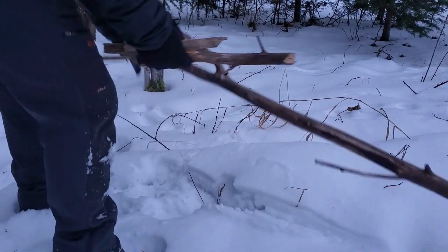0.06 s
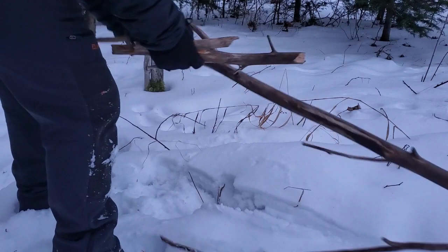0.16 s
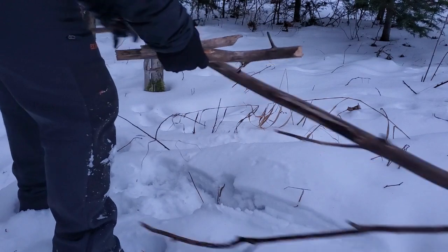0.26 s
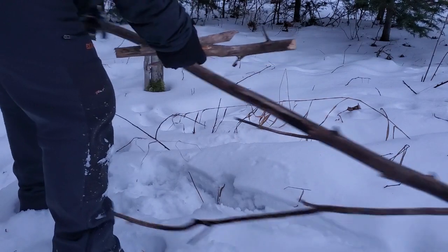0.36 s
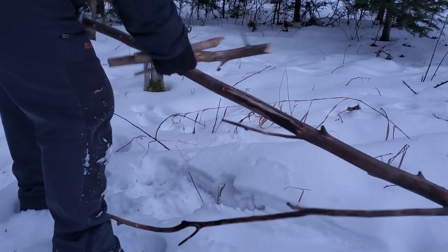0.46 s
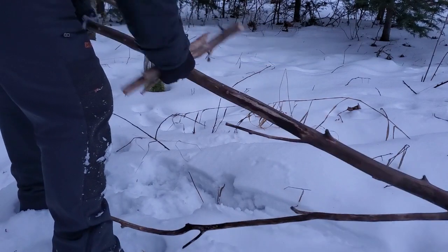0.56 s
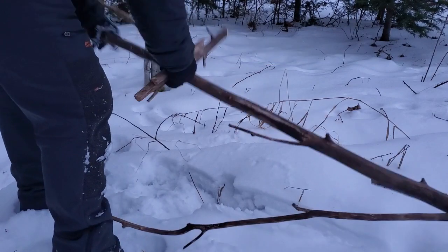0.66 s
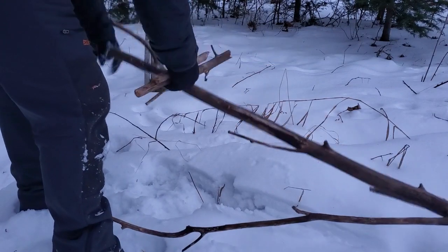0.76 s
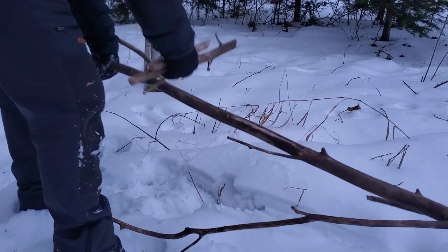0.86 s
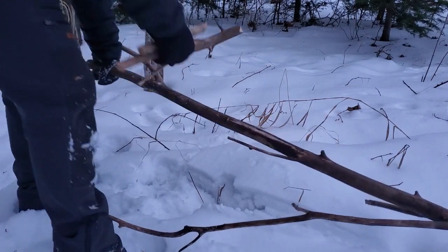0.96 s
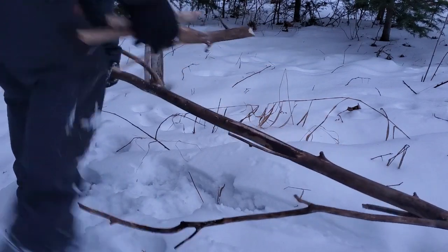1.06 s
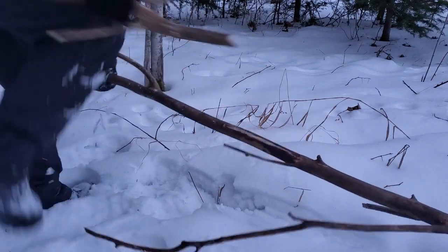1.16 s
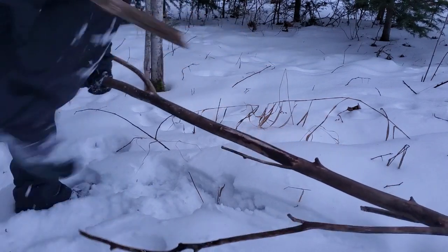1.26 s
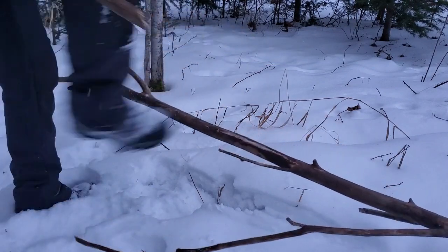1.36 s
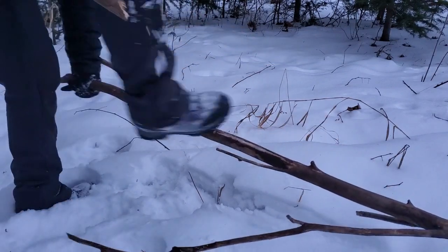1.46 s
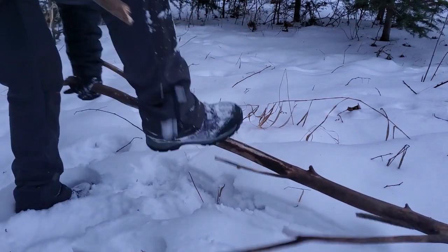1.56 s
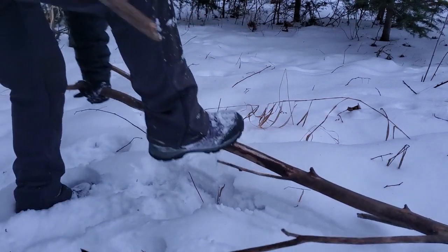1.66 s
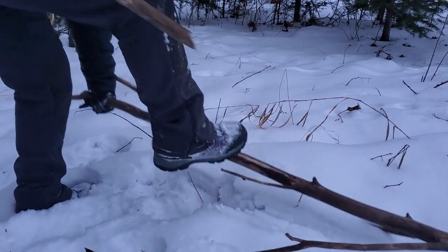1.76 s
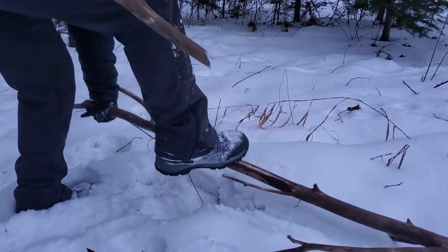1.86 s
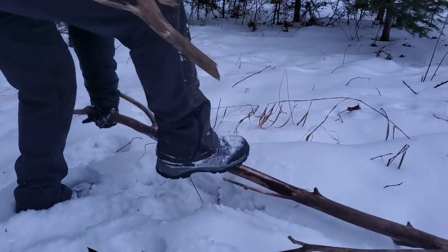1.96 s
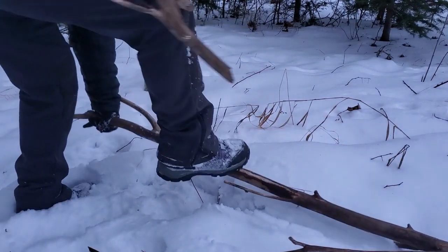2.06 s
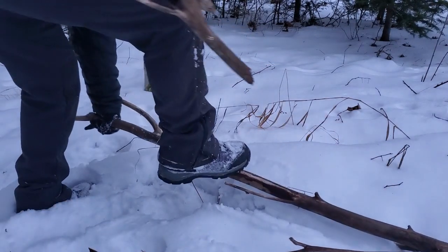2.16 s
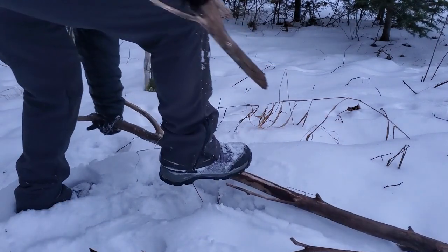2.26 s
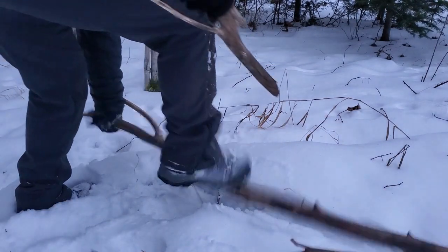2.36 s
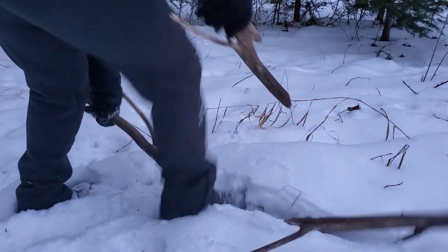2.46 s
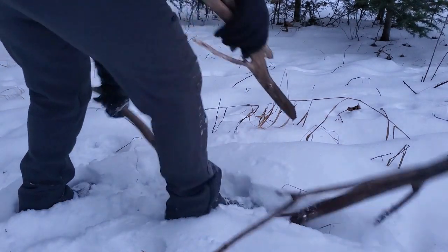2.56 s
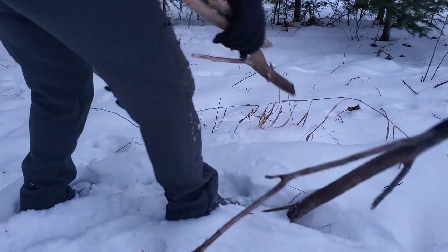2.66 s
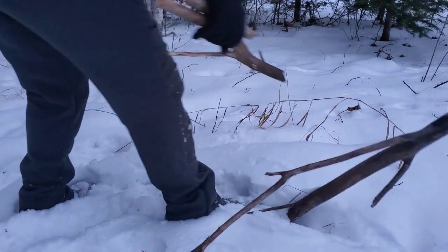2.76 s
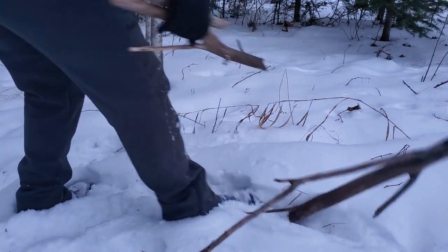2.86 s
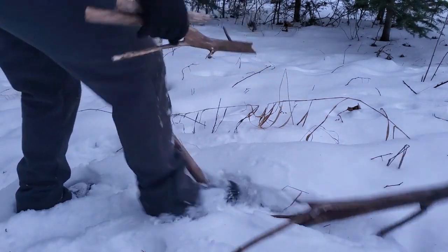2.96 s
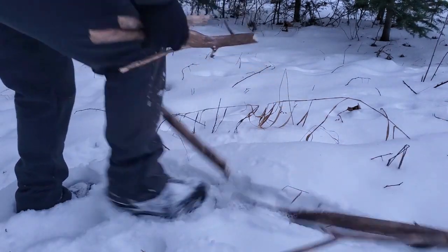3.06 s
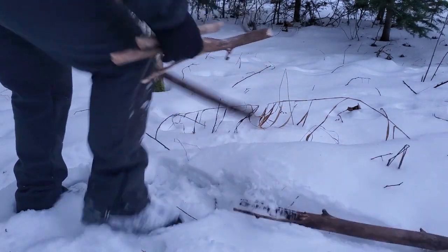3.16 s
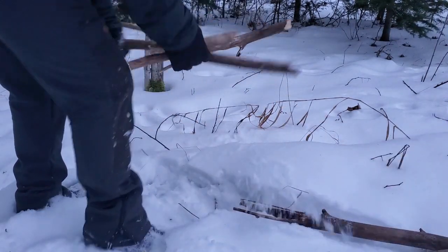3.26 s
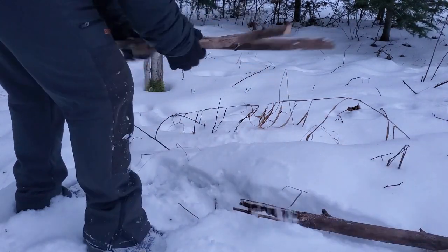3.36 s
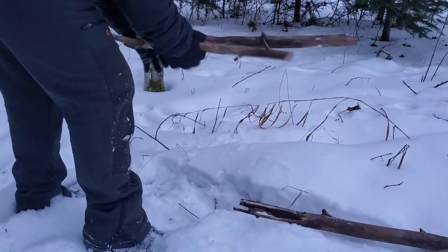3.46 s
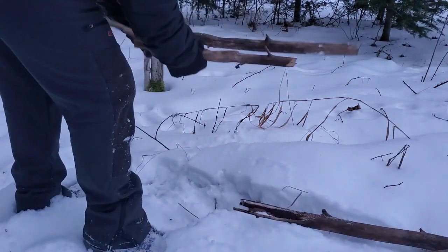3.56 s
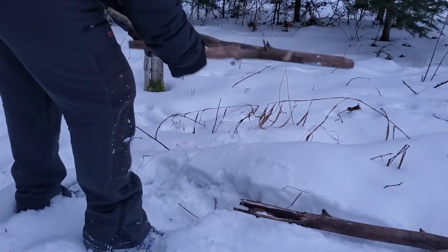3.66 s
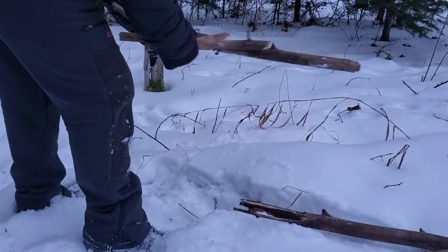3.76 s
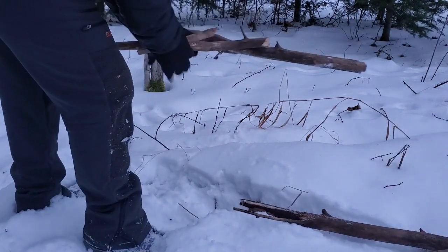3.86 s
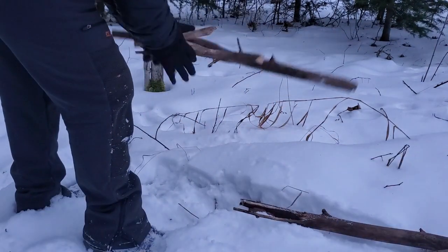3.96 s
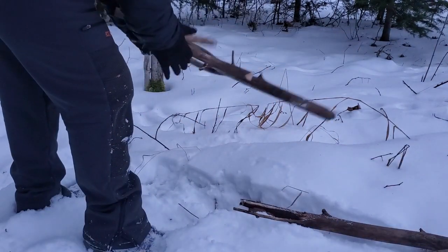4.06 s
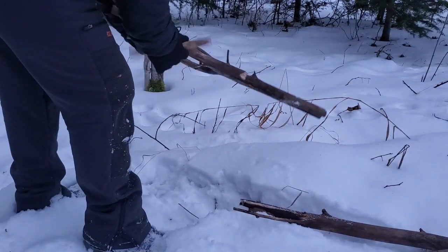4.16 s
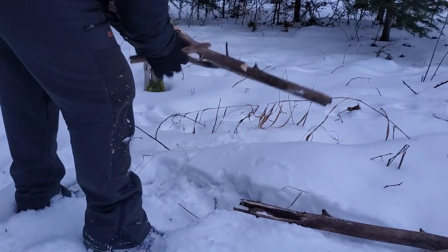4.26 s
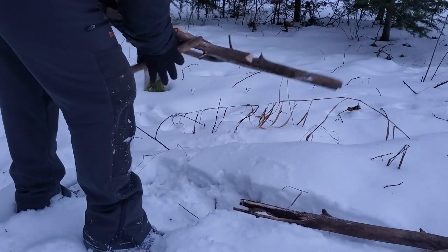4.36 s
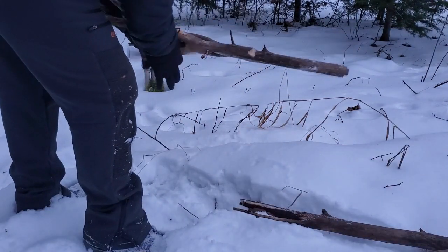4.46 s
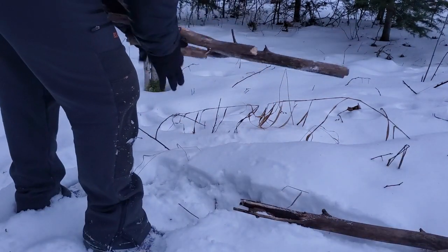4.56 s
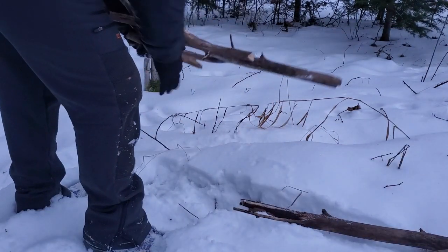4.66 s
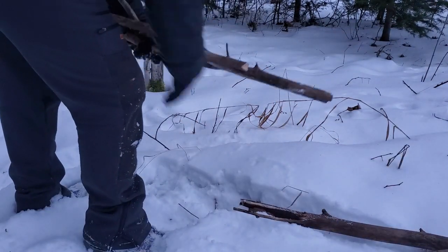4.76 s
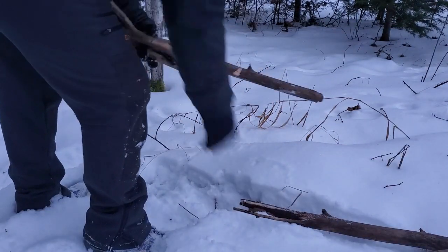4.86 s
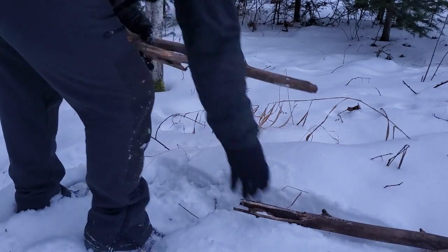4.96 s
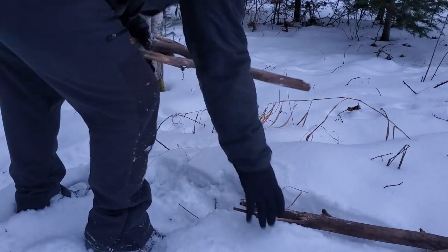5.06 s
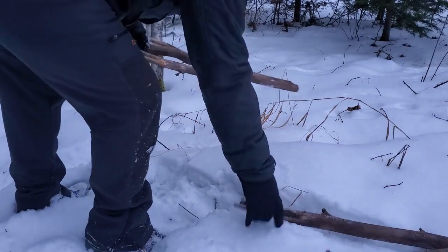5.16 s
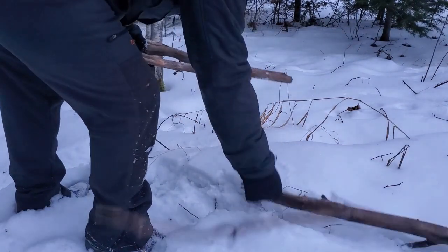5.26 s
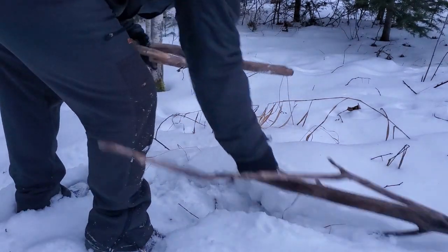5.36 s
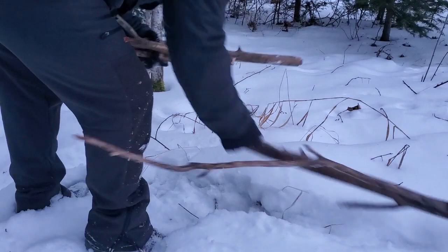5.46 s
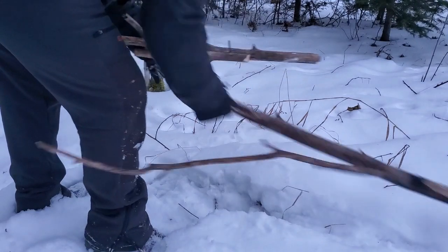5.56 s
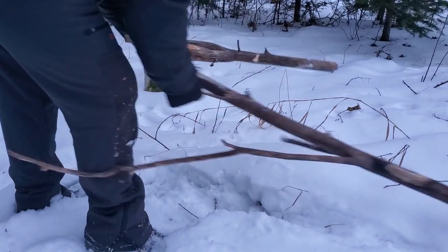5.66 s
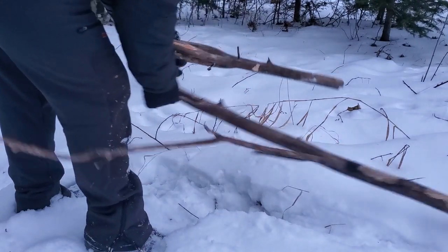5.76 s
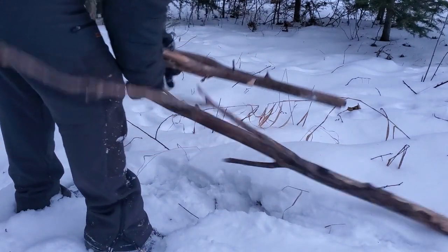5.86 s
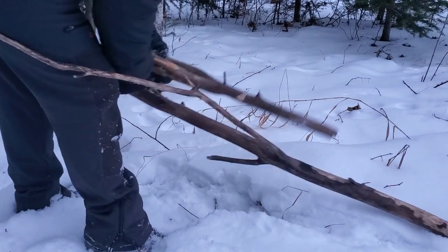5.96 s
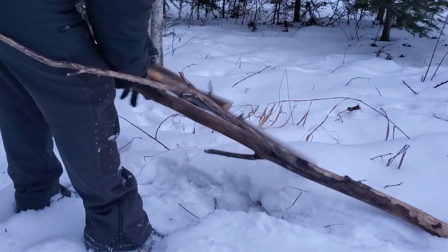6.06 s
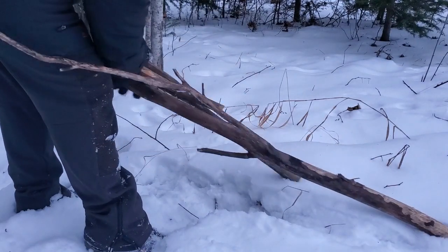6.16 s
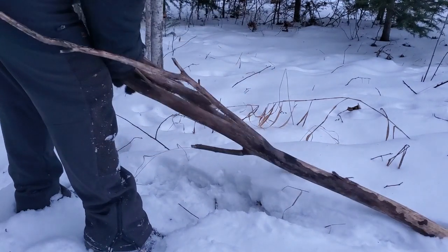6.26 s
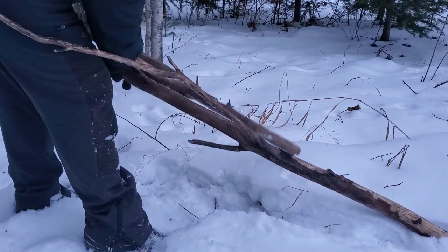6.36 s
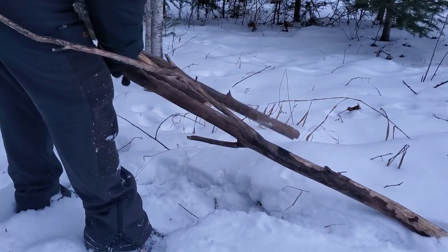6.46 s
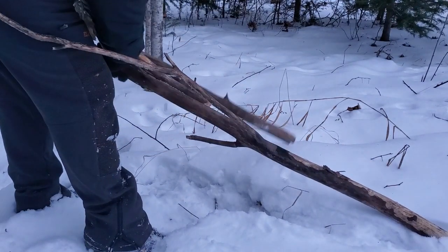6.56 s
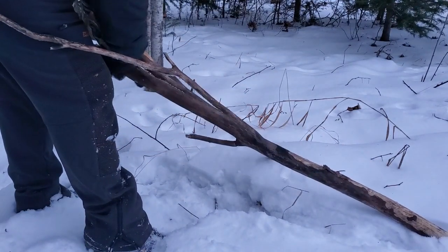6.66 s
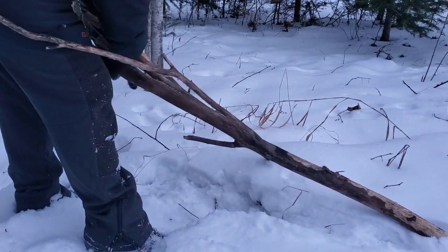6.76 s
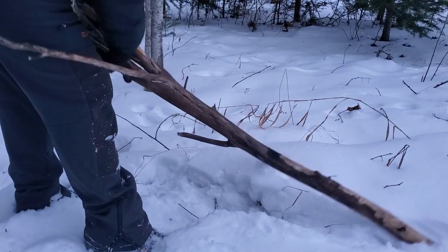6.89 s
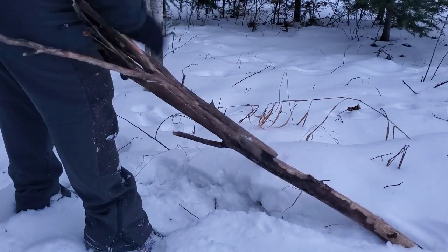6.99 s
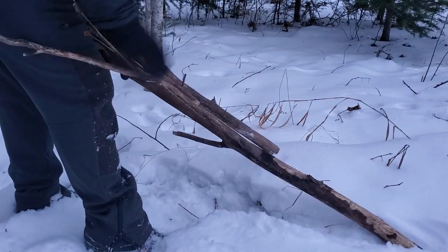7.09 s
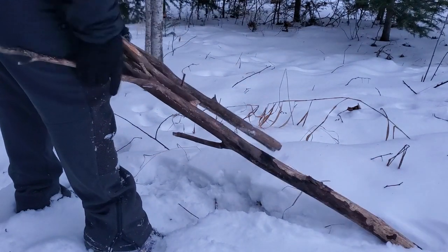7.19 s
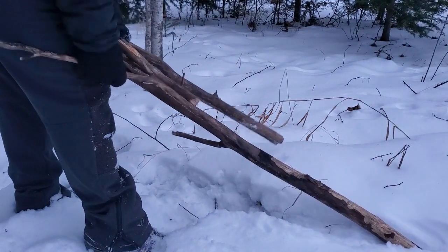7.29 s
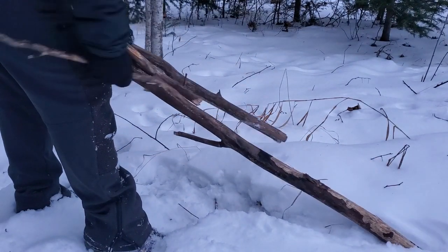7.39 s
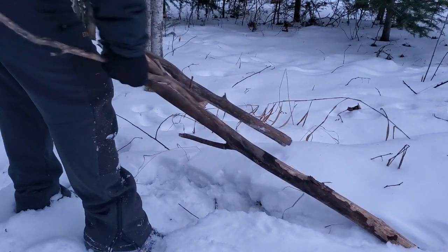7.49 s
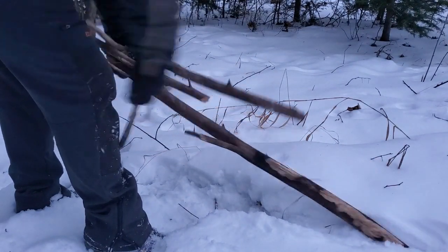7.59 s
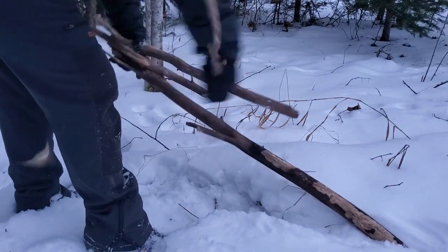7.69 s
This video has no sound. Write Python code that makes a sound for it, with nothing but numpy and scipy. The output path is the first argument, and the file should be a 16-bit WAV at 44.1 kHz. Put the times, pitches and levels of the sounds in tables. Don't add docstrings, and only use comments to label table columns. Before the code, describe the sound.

Close outdoor sound in a snowy wood. Boots crunch through crust while bark scrapes, then a dead branch creaks in tiny ticks and breaks in a loud, splintering double snap. More snow crunches, then near quiet with faint stick taps, gloved rustles and soft wind thumps. Sticks are gathered with light clacks and scraping before a final sharp dry crack at the end.

```python
import sys
import numpy as np
from scipy import signal
from scipy.fft import rfft, irfft
from scipy.io import wavfile
from scipy.ndimage import uniform_filter1d, map_coordinates

SR = 44100
rng = np.random.default_rng(int(sys.argv[2]) if len(sys.argv) > 2 else 0)


def level_to_linear(level):
    exponent = np.asarray(level, float) / 20
    return 10 ** exponent


def master(y):
    cut = np.clip(np.atleast_2d(y).T, -1, 1)
    pcm = np.round(cut * 32767)
    wavfile.write(sys.argv[1], SR, pcm.astype(np.int16))


N = 340893

# t/s, peak level/dB, ring f/Hz, bright share/dB, length/ms
SNAPS = [(2.2836, -23.5, 5000, -20, 0.66), (2.2882, -15.5, 4770, -15, 0.48), (2.2993, -18, 2300, 0.5, 1.13),
         (2.3663, -5.5, 3970, -1, 1.03), (2.37, -11.5, 3280, -13, 1.5), (2.3753, 1.5, 1970, -3.5, 1),
         (2.3771, -1, 2500, -13, 2.5), (2.3888, -19, 2240, -15, 1.1), (2.4582, -8, 2350, -5.5, 1.5),
         (2.46, -10, 2160, -12.5, 2.55), (3.578, -51.5, 4910, -4, 1.6), (5.133, -50, 3316, -12.5, 1.6),
         (5.1525, -43.5, 3220, -15, 3.2), (7.4128, -33, 5010, -3.5, 2.1), (7.4178, -37, 5000, 4, 0.91),
         (7.4985, -44, 5500, -3, 0.77), (7.5153, -1, 3896, -3, 1.2), (7.5172, -6, 7100, -12, 1.5),
         (7.5545, -18.5, 1900, -35, 1.6)]
# f/Hz, level/dB
TEAR_SPECTRUM = [(2600, -30), (4500, 1), (5500, -3.5), (6400, -4), (8050, 3), (9000, -4.5), (10400, -26.5),
                 (12500, -7.5), (15300, -13), (16800, -40)]


def snaps():
    def shape(t, length_ms):
        crack = np.exp(-(1000 * t / length_ms) ** 2.1) * (1 - np.exp(-t / 0.00045))
        tail = level_to_linear(-25.5 - 60 * t / .03)
        return crack + tail
    return level_to_linear(-0.5) * bursts(SNAPS, shape, width=.2, grit_db=-6, hiss_db=12.5)


# t/s, level/dB, f/Hz, t60/s
BRANCH_MODES = [(7.5165, -21.5, 700.5, 0.073), (7.5165, -27.5, 1000, 0.059), (7.516, -8.5, 2230, 0.018),
                (7.5161, -3.5, 2990, 0.015), (2.3765, -31, 810, 0.08), (2.3765, -24, 2020, 0.03),
                (2.4595, -8.5, 2270, .015), (2.4595, -24.5, 202.5, 0.061), (3.106, -37, 121, 0.12),
                (1.55, -38, 234, 0.068), (3.859, -45.5, 335, 0.066), (3.859, -50, 516, 0.094),
                (2.3765, -29.5, 380, .06), (7.5545, -17.5, 1064, 0.03), (7.541, -28, 3200, .012),
                (7.549, -27, 2000, .012), (4.365, -52, 1000, .025), (4.8375, -52, 1470, .05),
                (4.238, -50, 1480, .05), (4.514, -58, 850, .08), (3.424, -57, 3400, .06),
                (3.803, -62, 3450, .04)]


def branch():
    out, t = np.zeros(N + SR), np.arange(SR // 4) / SR
    for s, db, hz, t60 in BRANCH_MODES:
        swell = 1 - np.exp(-t * hz / 0.47)
        out[round(s * SR):][:len(t)] += level_to_linear(db - 60 * t / t60) * swell * np.sin(2 * np.pi * hz * t)
    return out[:N]


# t/s, peak level/dB, ring f/Hz, bright share/dB, t60/s
CREAKS = [(1.7654, -32, 2180, -12, 0.02), (1.8243, -33, 2210, -12, 0.02), (1.8564, -47, 1340, -12, 0.02),
          (1.941, -40, 3440, -13, 0.02), (1.9484, -41, 3350, -12, 0.02), (1.956, -36, 3360, -13, 0.02),
          (1.9859, -33, 1240, -17, 0.02), (1.9984, -33, 1200, -14, 0.02), (2.0154, -33, 3240, -17, 0.02),
          (2.0234, -34, 1140, -19, 0.02), (2.0388, -35, 1150, -12, 0.02), (2.0484, -34, 1870, -13, 0.02),
          (2.0624, -36, 1000, -17, 0.02), (2.0812, -35, 1290, -16, 0.02), (2.0934, -35, 1630, -16, 0.02),
          (2.1004, -38, 1360, -15, 0.02), (2.1274, -37, 1620, -22, 0.02), (2.1445, -35, 1200, -16, 0.02),
          (2.1615, -33, 1660, -10, 0.02), (2.3974, -22, 1910, -12, 0.02), (2.4094, -22, 2520, -15, 0.02),
          (2.4764, -24, 1890, -13, 0.02), (2.5764, -34, 1780, -17, 0.02), (3.0774, -27, 1520, -11, 0.02),
          (3.1394, -37, 2600, -10, 0.02), (6.8274, -41, 3980, -15, 0.02), (7.5324, -18, 993, -20, 0.02),
          (7.5704, -29, 2890, -18, 0.02), (7.5914, -29, 2330, -22, 0.02)]


def creaks():
    def shape(t, t60):
        return level_to_linear(-60 * t / t60) * (1 - np.exp(-t / 0.0004))
    return level_to_linear(-2.5) * bursts(CREAKS, shape, width=0.2, grit_db=1.5, hiss_db=10.5)


# t/s, peak level/dB, low mode f/Hz, high mode f/Hz, bright share/dB
KNOCKS = [(.533, -46.5, 2140, 3180, -12), (.667, -50, 1400, 2290, -14), (2.243, -40, 1220, 3010, -8.5),
          (3.4227, -49, 1526, 3390, -14), (3.802, -54.5, 1630, 3450, -8), (3.8589, -37.5, 950, 2195, -31),
          (4.2371, -44.5, 1480, 2250, -30), (4.3643, -46, 1760, 3100, -24), (4.5127, -51, 847, 3250, -21),
          (4.636, -56.5, 873, 3450, -26), (4.8368, -50.5, 1470, 2490, -24),
          (5.668, -39.5, 1093, 2830, -20.5), (5.6996, -31.5, 1800, 2880, -18), (5.707, -39, 875, 1800, -18),
          (5.814, -53, 1060, 2900, -5), (6.0779, -48, 950, 3003, -4.5), (6.347, -59.5, 1010, 3140, -14),
          (6.455, -44, 949, 2180, -26.5), (6.615, -62, 2200, 3500, -11), (6.866, -48.5, 1034, 2050, 1),
          (7.183, -53, 1320, 1730, -21.5)]
# f/Hz, level/dB
STICK_SPECTRUM = [(150, -39), (300, -2), (1000, -1), (2200, -6.5), (2900, -12), (4500, -24), (6500, -48.5),
                  (12000, -120)]


def knocks():
    out, t = np.zeros(N + SR), np.arange(6144) / SR
    fine, stick = response(TEAR_SPECTRUM), response(STICK_SPECTRUM)
    for s, db, low_hz, high_hz, bright_db in KNOCKS:
        rattle_t60 = .058 * np.exp(-.018 * (bright_db + 14.5))
        noise = rng.standard_normal(len(t))
        decay = level_to_linear(-60 * t / 0.0058) + level_to_linear(-11.0 - 60 * t / rattle_t60) + level_to_linear(-23 - 60 * t / 0.24)
        blow = decay * noise
        two_modes = mode(t, low_hz, 0.15 * low_hz) + level_to_linear(-0.5) * mode(t, high_hz, 0.12 * high_hz)
        ringing = through(through(blow, two_modes), stick)
        body = to_peak(ringing) + level_to_linear(-2.5) * to_peak(through(blow, stick))
        tick = through(level_to_linear(-60 * t / 0.013) * noise, fine)
        knock = to_peak(body) + level_to_linear(bright_db + 7.0) * to_peak(tick)
        out[round(s * SR):][:len(t)] += level_to_linear(db + 1.0) * knock
    return out[:N]


# t/s, peak level/dB, ring f/Hz, bright share/dB, t60/s
LUMPS = [(0.019, -23.5, 2000, -9.5, 0.064), (0.346, -39, 1450, -23, 0.04),
         (1.555, -34.5, 926, -11.5, 0.099), (1.622, -34, 2730, -9, 0.066), (1.696, -38, 2160, -10, 0.038),
         (1.753, -28, 2140, -10, 0.02), (1.818, -32.5, 2240, -3, 0.071), (1.971, -34.5, 1130, -6, 0.036),
         (2.189, -24.5, 1520, -10, 0.017), (2.212, -35, 1270, -20, 0.023), (2.948, -30, 2240, -13, 0.02),
         (2.956, -32, 1130, -14, 0.23), (3.104, -31, 1010, -12.5, 0.063), (3.268, -21, 2400, -33, 0.067),
         (4.974, -36.5, 910, -14.5, 0.046), (5.142, -45.5, 3110, -17.5, 0.039),
         (5.246, -32.5, 3000, -20, 0.08), (6.099, -38.5, 1910, -8, 0.027),
         (6.811, -40.5, 2050, -14.5, 0.04), (6.901, -39, 1030, -2, 0.04), (6.958, -34, 3270, 3, 0.026),
         (7.362, -43.5, 1390, -5, 0.025)]


def lumps():
    def shape(t, t60):
        return level_to_linear(-60 * t / t60) * (1 - np.exp(-t / 0.0012))
    return level_to_linear(-3.5) * bursts(LUMPS, shape, width=0.17, grit_db=-0.5, hiss_db=13.0)


def bursts(rows, shape, width, grit_db, hiss_db):
    out, t = np.zeros(N + SR), np.arange(2048) / SR
    crisp, fine = response(CRISP_SPECTRUM), response(TEAR_SPECTRUM)
    for s, db, hz, bright_db, length in rows:
        burst = shape(t, length) * rng.standard_normal(len(t))
        ring = through(through(burst, mode(t, hz, width * hz)), mode(t, hz, 1.2 * hz))
        grit = level_to_linear(grit_db) * to_peak(through(burst, crisp))
        hiss = level_to_linear(bright_db + hiss_db) * to_peak(through(burst, fine))
        out[round(s * SR):][:len(t)] += level_to_linear(db) * to_peak(to_peak(ring) + grit + hiss)
    return out[:N]


# f/Hz, level/dB
DULL_SPECTRUM = [(71, -26.5), (120, -0.5), (209, -8.5), (290, -5), (493, -7), (762, -2.5), (2000, -6),
                 (2600, -32.5), (4400, -120)]
# f/Hz, level/dB
CRISP_SPECTRUM = [(710, -31), (1200, -6), (1940, -4), (2110, 0), (3360, -1), (3680, -4.5), (5010, -3.5),
                  (6200, -13.5), (8060, -41), (13600, -120)]
# f/Hz, level/dB
FINE_SPECTRUM = [(2820, -37), (4800, 0.5), (5230, 0), (6120, -8), (6620, 0), (8050, 3), (9050, -1.5),
                 (10200, -20.5), (13300, -49), (22000, -120)]
# f/Hz, level/dB
ICY_SPECTRUM = [(6000, -39), (10200, -9), (12600, 3.5), (15500, -5.5), (16300, -12.5), (16500, -52.5)]


def crunch():
    level, dull, sharp, icy = pressure()
    clump = slips(70, fall_s=0.0093, depth_db=1.8) + 1.2 * wobble(160)

    def layer(spectrum, rough_db):
        return patchy(coloured(grains(rough_db, clump), spectrum), patchy_db=2.5)

    middle = level * layer(CRISP_SPECTRUM, rough_db=1.5)
    coarse = dull * layer(DULL_SPECTRUM, rough_db=0.0)
    fine = sharp * layer(FINE_SPECTRUM, rough_db=1.0)
    press = (level / level_to_linear(-50)) ** .17
    crystals = level_to_linear(-9.5) * icy * press * layer(ICY_SPECTRUM, rough_db=2.5)
    return level_to_linear(-1.0) * (middle + coarse + fine + crystals + level * rubbing(clump))


# t/s of most pressure, level/dB, rise/ms, fall/ms, dull share/dB
TREADS = [(0.08, -35.5, 100, 66, -2.5), (.412, -42, 137, 64, -6), (.886, -51.5, 76, 39, -13),
          (1.062, -47, 92, 59, -2), (1.174, -56, 47, 98, -0.5), (1.54, -58, 9, 200, 8),
          (1.625, -48.5, 76, 93, -2.5), (1.772, -43, 44, 108, -3), (3.074, -40.5, 200, 69, -0.5),
          (3.04, -44, 60, 80, -3), (3.125, -49, 11, 98, -8), (3.145, -51, 30, 60, -5),
          (3.215, -42.5, 50, 90, -3), (3.245, -45, 50, 70, -3), (1.701, -48, 25, 35, -8),
          (3.28, -37, 80, 35, -2), (3.424, -58.5, 3, 85, -22.5)]
# t/s, level/dB, rise/ms, fall/ms, dull share/dB
STRAINS = [(2.02, -49, 170, 15, -3), (2.052, -49, 40, 28, -3), (2.084, -49, 4, 60, -9),
           (2.187, -49, 153, 160, -1), (2.318, -49.5, 41, 60, 0.5), (2.39, -34.5, 14, 90, -2.5),
           (2.46, -31, 80, 63, -3.5), (2.5, -43, 33, 300, -1.5), (2.525, -41, 100, 30, -2),
           (7.5, -58, 257, 20, 4), (7.54, -37, 52, 60, -3), (7.58, -48, 40, 134, -7)]
# t/s, level/dB, rise/ms, fall/ms, dull share/dB
GRIPS = [(3.585, -67, 120, 30, -16), (4.986, -49.5, 18, 39, 0), (5.29, -41, 66, 36.5, -10),
         (5.6, -57.5, 90, 81, -4.5), (5.67, -51.5, 47, 36, -5), (5.72, -52, 40, 57, -10),
         (5.89, -57.5, 185, 91, -9.5), (6.099, -58.5, 15, 70, -1.5), (6.235, -64, 25, 400, -6),
         (6.475, -67.5, 49, 174, 3), (6.826, -56, 53, 128, -7), (6.903, -43.5, 7, 125, -8.5),
         (7.19, -68.5, 5, 260, -2.5)]
# t/s, level/dB, rise/ms, fall/ms, dull
# share/dB
BRUSHES = [(3.535, -78, 20, 80, -5), (3.845, -78, 50, 40, -5), (3.91, -76, 40, 100, -5),
           (3.965, -79, 100, 10, -5), (4.08, -72, 15, 60, -5), (4.13, -76, 80, 10, -5),
           (4.24, -78, 60, 40, -5), (4.286, -77, 5, 50, -5), (4.39, -74, 50, 30, -5),
           (6.603, -74, 3, 40, -5), (6.78, -75, 250, 60, -5), (7.15, -79, 60, 40, -5)]
# t/s, rustle level/dB, fine share/dB
BUSY = [(0, -50.5, -2), (.3, -56, -10.5), (.5, -60.5, -5), (.74, -63.5, -7.5), (.83, -75.5, -3),
        (1.53, -80, -1), (1.9, -76, -4), (2.9, -63, -3), (3.4, -72, -1), (3.66, -89.5, 3), (4.08, -84, -3),
        (4.6, -86.5, -3), (4.9, -71, -2), (5.1, -67, -3.5), (6.05, -76, 4), (6.7, -84.5, 9.5),
        (7.18, -87, -3), (7.35, -71, -5)]


def pressure():
    kinds = [(TREADS, -4, -4.5), (STRAINS, -3, -4.5), (GRIPS, -4, -5), (BRUSHES, 2.5, -3)]
    gains = np.vstack([swells(rows) for rows, *_ in kinds])
    shares_db = [(row[-1], fine_db, icy_db) for rows, fine_db, icy_db in kinds for row in rows]
    dull, fine, icy = level_to_linear(np.transpose(shares_db))[:, :, None]
    busy_db, busy_fine_db = curves(BUSY)
    layers = [(1, 0), (dull, -3), (fine, busy_fine_db), (icy, busy_fine_db - 5)]
    return [np.hypot(joined(gains * share), level_to_linear(busy_db + db)) for share, db in layers]


# start t/s, end t/s, f/Hz,
# width f/Hz, share level/dB
RUBS = [(0.092, 0.798, 1376, 89.5, -7.5), (0.202, 0.334, 2480, 130, 2.5), (0.367, 0.461, 2480, 109, 2.5),
        (0.43, 0.725, 2140, 110, -1), (.7, 0.8, 2900, 200, 3), (1.91, 2.265, 1270, 200, -1.5),
        (1.9, 2.145, 3370, 220, -2.5), (3.027, 3.1, 1510, 250, -5), (3.035, 3.096, 3274, 200, -3.5),
        (3.857, 4.049, 1456, 89.5, -3.5), (4.104, 4.5, 1990, 90.5, 0), (4.838, 4.918, 1453, 90, 4),
        (5.242, 5.307, 5430, 302, -6), (5.537, 6.996, 1000, 49.9, -7.5), (5.55, 7.0, 1915, 90.6, -7.5),
        (5.56, 6.99, 2870, 100, -8), (6.884, 6.956, 985, 49.7, -6), (5.549, 7.002, 4860, 120.3, -9.5),
        (7.18, 7.507, 1420, 148.6, -1.5), (7.182, 7.499, 3070, 249, -1), (7.532, 7.733, 2980, 220, 0),
        (7.53, 7.702, 5570, 220, -6.5), (6.66, 6.84, 8500, 700, 0), (6.89, 7.02, 12400, 900, -12),
        (6.8, 6.94, 4000, 200, -3), (.05, .13, 1000, 250, -2), (.18, .45, 3000, 200, -4),
        (.66, .72, 2000, 500, 2), (3.5, 3.62, 8300, 800, -3), (3.52, 3.61, 5400, 400, 0)]


def rubbing(clump):
    out, scrape = np.zeros(N), grains(2.2, clump)
    t = np.arange(1024) / SR
    for start, end, hz, width_hz, db in RUBS:
        part = scrape[round(start * SR):round(end * SR)]
        fade = np.sqrt(np.hanning(len(part)) ** 0.9)
        body = mode(t, hz, width_hz)
        stroke = through(part, body / np.linalg.norm(body))
        out[round(start * SR):][:len(part)] += level_to_linear(db) * fade * stroke
    return out


def grains(rough_db, clump):
    return unit(level_to_linear(rough_db * wobble(900) + clump) * rng.standard_normal(N))


def slips(rate, fall_s, depth_db):
    kicks = (rng.random(N) < rate / SR) * rng.exponential(1, N)
    load = signal.lfilter([1], [1, -np.exp(-1 / (fall_s * SR))], kicks) + 0.39
    return depth_db * unit(np.log(load) - np.log(load).mean())


def patchy(x, patchy_db):
    z = signal.stft(x, nperseg=256)[2]
    field = uniform_filter1d(rng.standard_normal(z.shape), 3, axis=0)
    field = uniform_filter1d(field, 18, axis=1)
    return unit(signal.istft(z * level_to_linear(patchy_db * unit(field)), nperseg=256)[1][:N])


# f/Hz, t60/s
TRUNK_DECAY = [(300, 0.096), (2500, .35), (12000, .2)]


def trunks(x):
    hz, t, z = signal.stft(rng.standard_normal(SR // 2), SR, nperseg=256)
    decay = level_to_linear(-60 * t / along(TRUNK_DECAY, hz)[:, None])
    tail = signal.istft(z * decay, SR, nperseg=256)[1]
    delayed = np.pad(x, (300, 0))
    return signal.fftconvolve(delayed, tail / np.linalg.norm(tail))[:N]


# t/s, level/dB, rise/ms, fall/ms
GUSTS = [(.17, -47.5, 800, 290), (.5, -56, 680, 1700), (1.55, -52.5, 200, 130), (2.11, -47, 520, 1100),
         (2.5, -50.5, 800, 160), (3.25, -56, 550, 260), (4.07, -54, 160, 350), (4.37, -40.5, 130, 246),
         (4.89, -49, 570, 290), (5.3, -54.5, 1650, 300), (5.53, -52, 140, 170), (5.77, -46, 226, 140),
         (6.2, -51.5, 160, 120), (6.95, -54.5, 2500, 220), (7.21, -50.5, 78, 180), (7.5, -49.5, 120, 390)]
# f/Hz, level/dB
BUFFET_SPECTRUM = [(8.8, -39), (15, -10.5), (33, -0.5), (54, -0.5), (72, -1.5), (124, -20.5), (220, -35.5),
                   (290, -67), (480, -120)]
# f/Hz, level/dB
HUSH_SPECTRUM = [(35, -30.5), (60, -0.5), (103, -2.5), (189, -12.5), (448, -4), (1200, -16.5), (2140, -19),
                 (6140, -25.5), (8510, -27.5), (16000, -31)]


def air():
    buffet = unit(level_to_linear(2.5 * wobble(15)) * coloured(rng.standard_normal(N), BUFFET_SPECTRUM))
    hush = level_to_linear(-79) * coloured(rng.standard_normal(N), HUSH_SPECTRUM)
    return joined(swells(GUSTS)) * buffet + hush


def swells(rows):
    slope_db = 21.5
    t = np.arange(0, N + 44, 44) / SR
    s, db, rise_ms, fall_ms = np.transpose(rows)[:4, :, None]
    return level_to_linear(db - slope_db * 1000 * np.abs(t - s) / np.where(t < s, rise_ms, fall_ms))


def joined(gains):
    total = np.sqrt(np.sum(gains ** 2, axis=0))
    return np.interp(np.arange(N) / 44, np.arange(gains.shape[1]), total)


def curves(rows):
    s, *cols = np.transpose(rows)
    return [np.interp(np.arange(N) / SR, s, c) for c in cols]


def wobble(rate):
    return map_coordinates(rng.standard_normal(int(N * rate / SR) + 4), [np.arange(N) * rate / SR])


def mode(t, hz, width_hz):
    ring = np.exp(-np.pi * width_hz * t) * np.sin(2 * np.pi * hz * t)
    return np.diff(ring, prepend=0) * SR / hz


def along(points, hz):
    f, v = np.transpose(points)
    return np.interp(np.log(hz + 1), np.log(f + 1), v)


def response(spectrum):
    size = 2 ** 12
    gain = np.maximum(level_to_linear(along(spectrum, np.fft.rfftfreq(size, 1 / SR))), 1e-4)
    cep = irfft(np.log(gain))
    cep[1:size // 2] *= 2
    cep[size // 2 + 1:] = 0
    h = irfft(np.exp(rfft(cep)))
    return h / np.linalg.norm(h)


def through(x, h):
    return signal.fftconvolve(x, h)[:len(x)]


def coloured(x, spectrum):
    return through(x, response(spectrum))


def unit(x):
    return x / np.sqrt(np.mean(x ** 2) + 1e-20)


def to_peak(x):
    return x / np.abs(x).max()


def scene():
    wood = snaps() + branch() + knocks()
    snow = lumps() + crunch()
    return (wood + creaks() + snow + level_to_linear(-21) * trunks(wood) + air())[None]


def low_pass(x):
    return signal.sosfilt(signal.butter(12, 17150, fs=SR, output="sos"), x)


def record(dry):
    soft = dry / (1 + np.abs(dry / 1.1) ** 6) ** (1 / 6)
    hz = np.fft.rfftfreq(N, 1 / SR)

    def edge(end_hz):
        return np.sin(np.pi / 2 * np.clip((end_hz - hz) / 400, 0, 1)) ** 2

    gain = np.maximum(edge(16200), level_to_linear(-17) * edge(17150))
    limited = irfft(rfft(soft) * gain, N)
    return low_pass(limited)


dry = scene()
out = record(dry)
master(out)
```